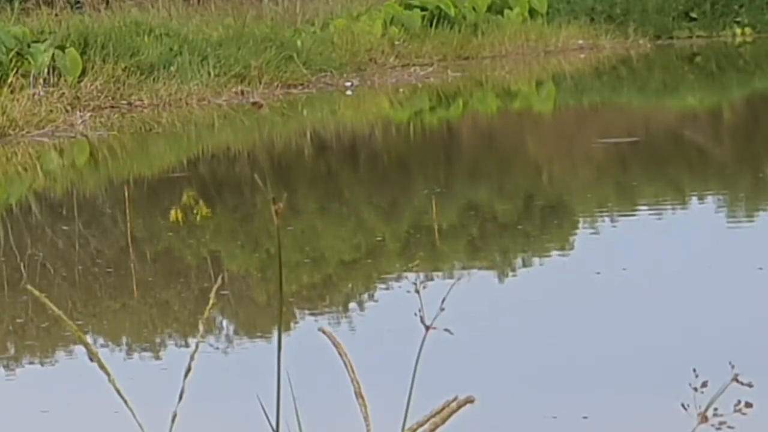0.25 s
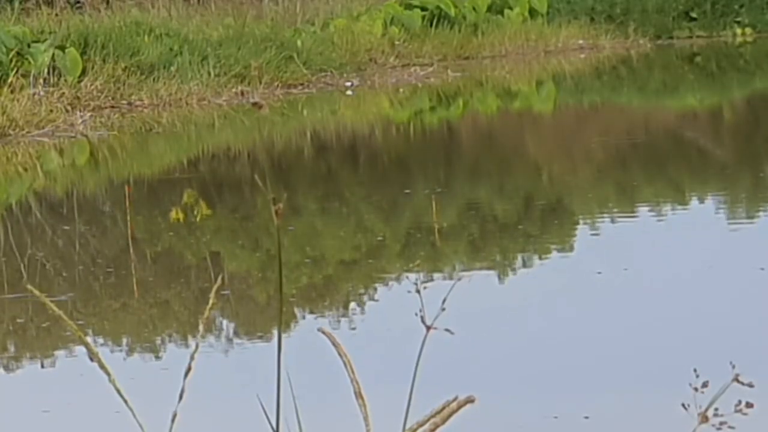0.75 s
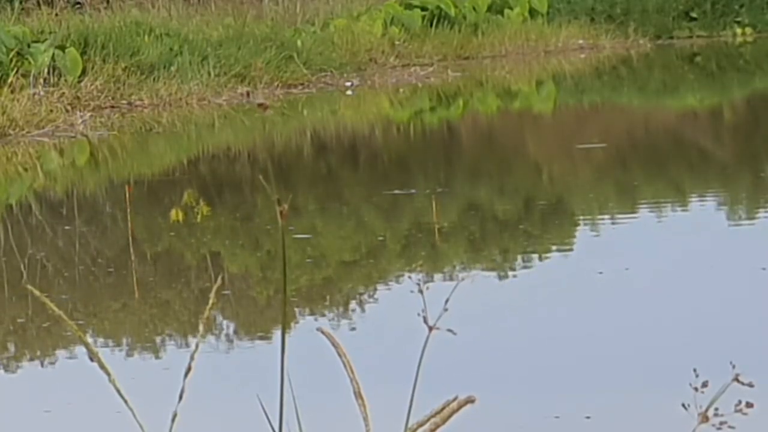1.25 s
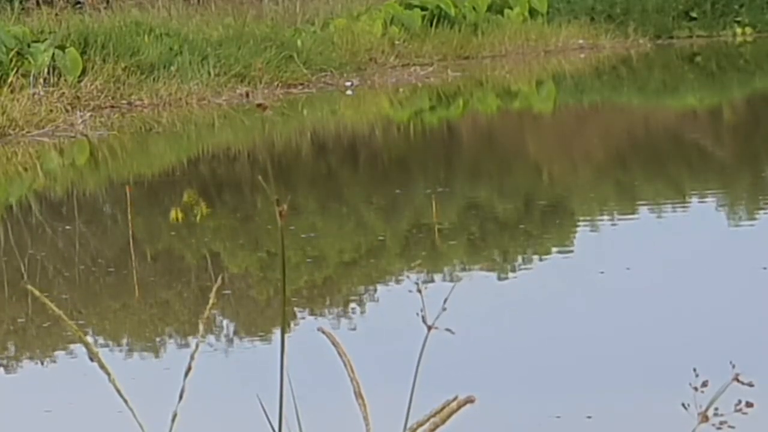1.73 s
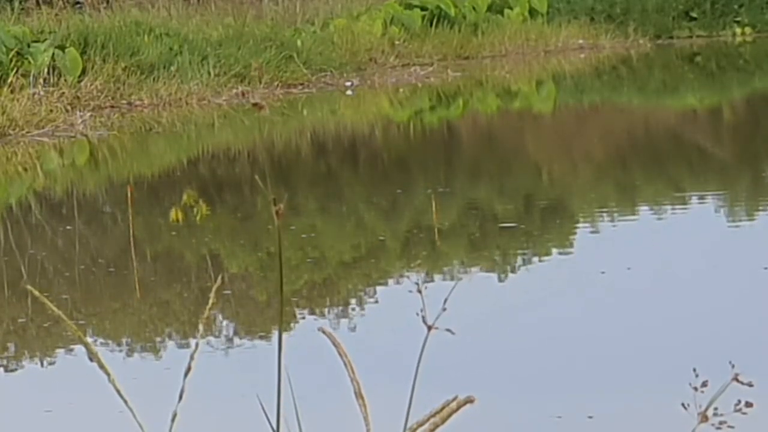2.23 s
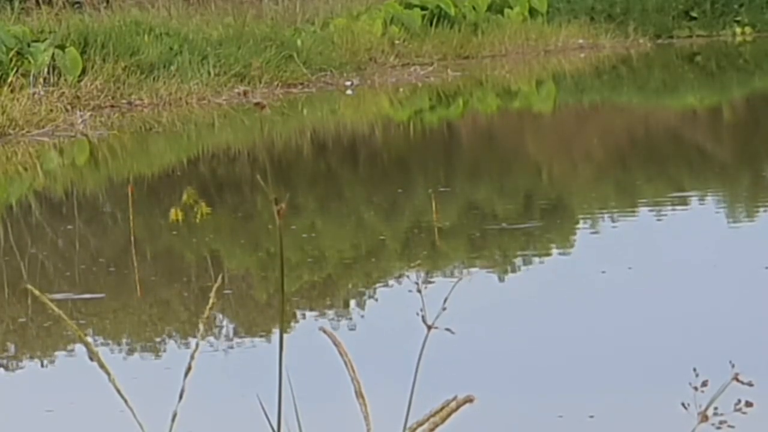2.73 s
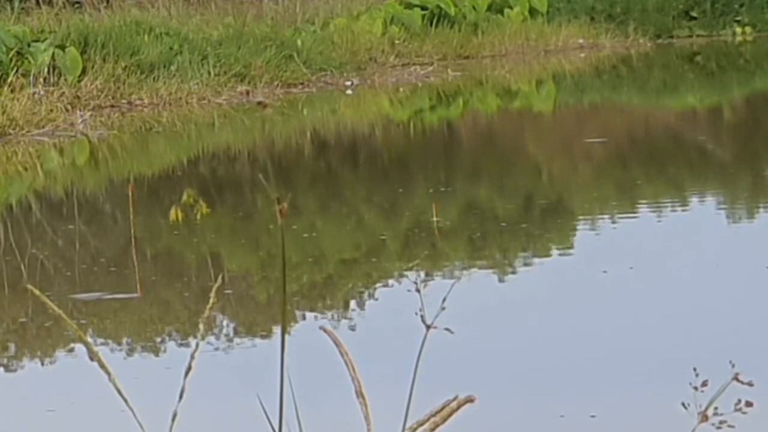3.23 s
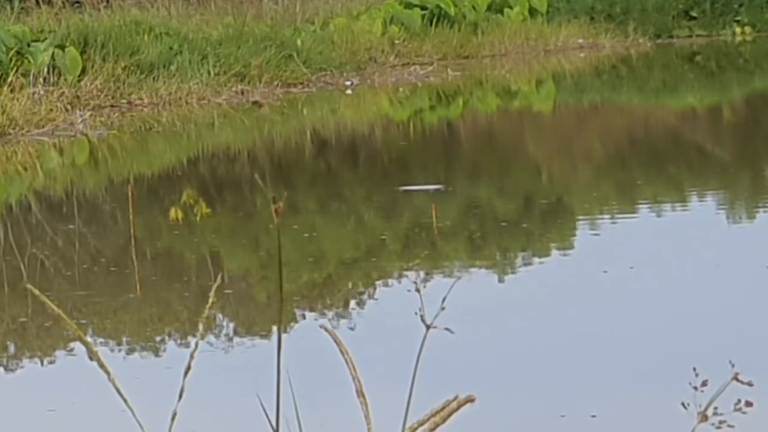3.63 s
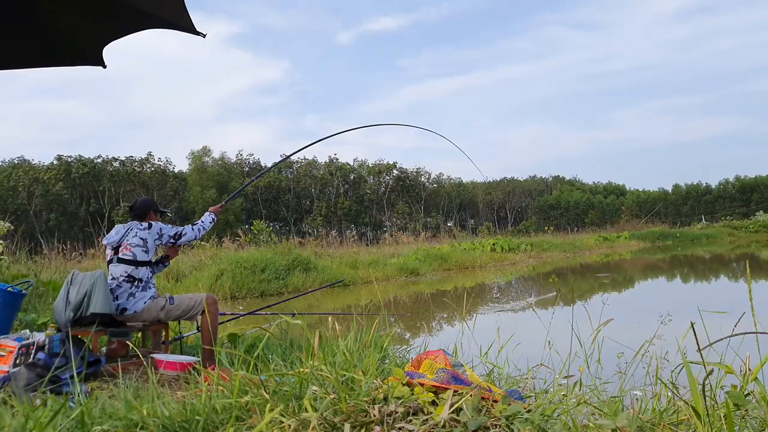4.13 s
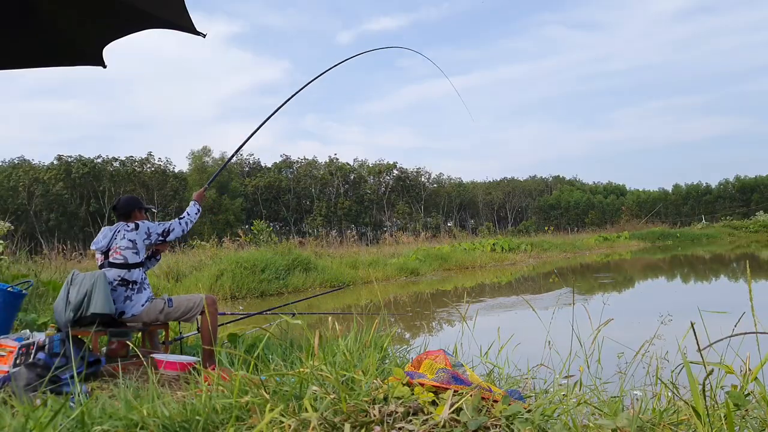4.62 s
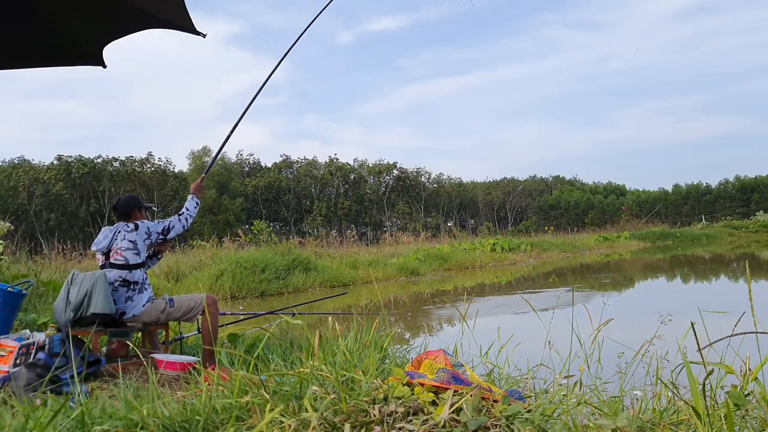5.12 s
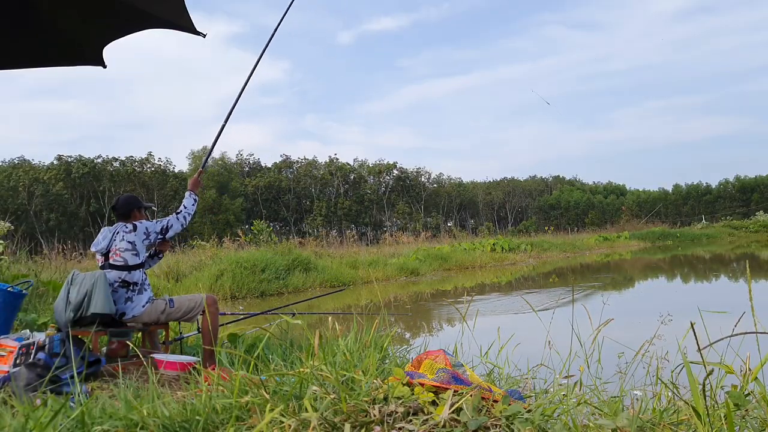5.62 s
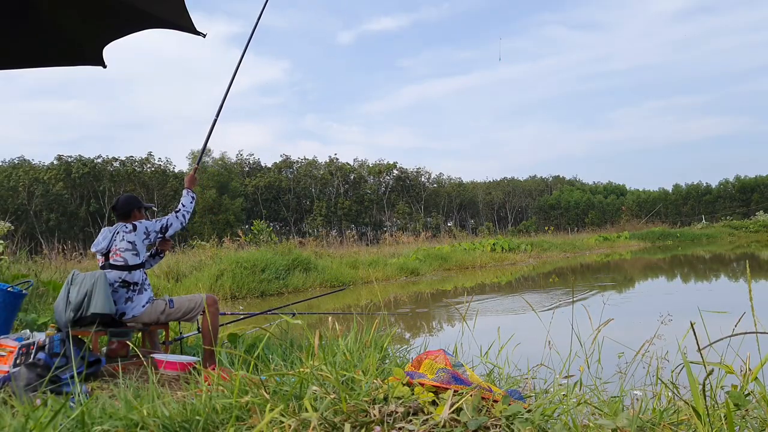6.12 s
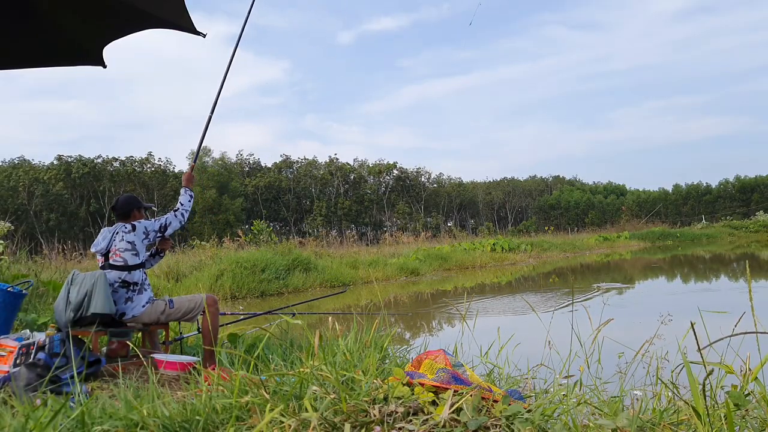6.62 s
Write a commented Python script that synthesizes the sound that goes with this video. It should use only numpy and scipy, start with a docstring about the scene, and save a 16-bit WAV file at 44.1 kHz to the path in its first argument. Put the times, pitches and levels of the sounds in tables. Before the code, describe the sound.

A quiet pond bank in wide stereo. Throughout, high crickets trill over a far, swelling insect buzz, a soft hiss and a low, distant rumble. A flock of birds chirps harshly, busiest in the first 2.5 seconds, then more sparsely. A cricket on the left grows louder from about 2 seconds and drops away near 3.7. A dove gives one barely audible coo around 3.4 seconds.

At about 4.1 seconds comes the loudest event: a quick whoosh falling in pitch, likely a fishing rod swept up, with one short, bubbly splash and spray. A dry tackle click and a couple of drops follow. From 4.5 seconds one songbird whistles three notes, while a higher one repeats a gliding phrase three times, louder each time. Insects tick in short runs. Near 6.5 to 6.8 seconds there are two small clicks and two drips as the crickets swell on both sides.

```python
"""Crickets trill and far insects swell over a low, distant rumble: a pond bank on a still day.
Three crickets rub their wings in quick strokes while a flock of birds chatters harshly.
A dove coos faintly. A whoosh falls in pitch, likely a rod swept up, and a hooked fish splashes once.
Drops and small tackle clicks follow, as insects tick and two songbirds whistle gliding notes."""
import sys
import numpy as np
from scipy import signal
from scipy.fft import rfft, irfft
from scipy.io import wavfile
from scipy.ndimage import uniform_filter1d

SR = 44100
rng = np.random.default_rng(int(sys.argv[2]) if len(sys.argv) > 2 else 0)


def transcribe(u):
    """Save the signal u as a 16-bit wav file named by the first command-line argument.

    u: samples, shape (n,) or (channels, n), limited to [-1, 1]; the rate is SR.
    q: integer samples, one column per channel.
    """
    v = np.clip(np.atleast_2d(u).T, -1, 1)
    q = np.round(v * 32767).astype(np.int16)
    wavfile.write(sys.argv[1], SR, q)


N = 302526
TIME = np.arange(N) / SR


RIGHT_BEAT, LEFT_BEAT, HIGH_BEAT = 88.0, 84.8, 112.48   # wing strokes per second
# Three crickets. Each row: time in seconds, wing strokes ahead of a steady beat, level in dB.
RIGHT_CRICKET = [(0, 0.22, -71.5), (1.5, 0.76, -70.5), (3.85, 1.35, -70), (3.95, 0.72, -69.5),
                 (5.4, 0.8, -66.5), (6.0, 0.59, -63.5), (6.86, 0.33, -61.5)]
LEFT_CRICKET = [(1.3, -0.38, -76), (1.52, -0.52, -70.5), (2.16, -0.26, -65.5), (2.23, -0.23, -61),
                (2.8, 0.0081, -59.5), (3.73, -0.31, -60), (3.76, -0.49, -76), (5.7, -0.69, -73),
                (6.3, -0.78, -63.5), (6.86, -0.23, -59)]
HIGH_CRICKET = [(0, -0.51, -78), (3.8, -0.57, -75), (4.2, -0.24, -75), (6.86, -0.82, -76)]

def cricket(rows, beat, top_hz, fall, stroke):
    """Each closing wing stroke is a pulse whose pitch falls; stroke is half its length in beats."""
    ahead, level_db = in_time(rows)
    from_peak = (beat * TIME + ahead + .5) % 1 - .5   # 0 at the height of a stroke
    swell = np.exp(-(from_peak / stroke) ** 2) * amp(0.96 * drift(60))
    hz = top_hz - fall * (from_peak + 0.23) * np.abs(from_peak + .2) + 40 * drift(49.14)
    return amp(level_db) * rms_one(tone(hz) * swell)


ARCH_HZ_PER_S = 1300   # a longer chirp arches higher in its middle
# The flock. Each row: start and length in seconds, level in dB, first pitch and slide in Hz.
CHIRPS = [(0.12, 0.12, -64.5, 2587, 96), (0.337, 0.1, -58.5, 2830, 284), (0.559, 0.13, -56, 2837, -100),
          (0.565, 0.091, -61, 4830, 201), (0.781, 0.1, -56, 2640, 446.5), (0.988, 0.13, -53, 2720, 59),
          (1.135, 0.029, -57, 5410, 20), (1.209, 0.099, -55, 2700, -37.5), (1.295, 0.062, -56, 3020, -150),
          (1.387, 0.037, -59.5, 2873, 32.5), (1.45, 0.067, -53, 2720, 1.5), (1.548, 0.042, -52.5, 2940, 63),
          (1.715, 0.13, -57, 2620, 80), (1.981, 0.098, -59.5, 2700, -1), (2.084, 0.1, -56.5, 3150, -150),
          (2.252, 0.13, -60, 2836, 198), (2.488, 0.12, -61, 2410, 299), (2.52, 0.073, -62.5, 4770, 294),
          (2.965, 0.052, -59.5, 3010, -330), (3.153, 0.073, -59.5, 2620, -200),
          (3.649, 0.05, -57.5, 2860, 307.5), (3.83, 0.11, -62.5, 2360, 269.5),
          (4.221, 0.062, -53.5, 2526, 404.5), (4.378, 0.078, -55.5, 2238, 244),
          (4.395, 0.11, -64, 4850, -800), (4.449, 0.036, -57, 3430, 44), (4.956, 0.052, -58.5, 2160, 143),
          (6.497, 0.067, -65, 2650, -250)]

def flock():
    """Harsh chirps from a shaky voice; midway through a low chirp a hoarse part opens above it."""
    level, hoarse, hz = np.zeros((2, N)), np.zeros(N), np.full((2, N), 3000.)
    for start, length, level_db, first_hz, slide_hz in CHIRPS:
        bird = int(first_hz > 4000)   # 0 is low, 1 is high, so their chirps can overlap
        progress = np.clip((TIME - start) / length, 0, 1)
        arch = np.sin(np.pi * progress) ** 2
        level[bird] += amp(level_db) * note(start, length, 0.0054)
        hoarse += amp(level_db - 2.5) * arch * (1 - bird)
        pitch = first_hz + slide_hz * progress + ARCH_HZ_PER_S * length * arch
        hz[bird] = np.where((progress > 0) & (progress < 1), pitch, hz[bird])
    clear = np.minimum(level[0] / amp(-51), 1)   # near birds ring clear, far ones only rasp
    wavering_hz = hz[0] + 60 * drift(35)
    voice = (.8 * rough(wavering_hz, 270) + clear * tone(wavering_hz)) * amp(2.5 * drift(40))
    return level[0] * voice + hoarse * rough(hz[0] + 620, 310) + level[1] * rough(hz[1], 360)


# Whoosh and spray. Each row: time in seconds, whoosh level in dB, its pitch in Hz, spray level in dB.
WHOOSH_AND_SPRAY = [(4.068, -57, 1700, -30), (4.1, -46.5, 1450, -46), (4.14, -51, 793, -51),
                    (4.168, -41, 649, -48.5), (4.2, -48.5, 694, -49), (4.26, -59, 675, -54),
                    (4.29, -63, 650, -75), (4.48, -79.5, 798, -70)]
# Single bubbles and drops. Each row: start in seconds, strength in dB, pitch in Hz.
DROPS = [(4.072, -29.5, 2980), (4.085, -26, 1560), (4.096, -28, 2690), (4.11, -31, 1000),
         (4.153, -25.5, 686), (4.163, -32.5, 490), (4.165, -26.5, 691), (4.176, -26.5, 2680),
         (4.179, -26.5, 652), (4.252, -39.5, 623), (4.36, -50, 935), (4.564, -46, 1167),
         (6.615, -48.5, 1410), (6.781, -36, 1050)]

def whoosh_and_splash():
    """A whoosh falls in pitch, likely the rod swept up, over a splash with single drops and spray."""
    whoosh_db, whoosh_hz, spray_db = in_time(WHOOSH_AND_SPRAY)
    start, end = WHOOSH_AND_SPRAY[0][0], WHOOSH_AND_SPRAY[-1][0]
    pops = rng.random(N) < 900 / SR   # about 900 a second
    pops = pops * amp(2.8 * np.minimum(rng.exponential(1, N), 4)) * rng.choice([-1, 1], N)
    sweep = rough(whoosh_hz, 193) * 700 / whoosh_hz
    crackle = rms_one(band(pops, 1130, 2850)) * whoosh_hz / 1100
    hiss = rms_one(band(rms_one(pops) + 2.0 * noise_pair(0), 3200, 10800))
    sounding = note(start, end - start, 0.0048)
    whoosh = sounding * amp(whoosh_db) * (sweep + crackle)
    spray = sounding * np.clip((TIME - start) / 0.11, 0, 1) * amp(spray_db) * hiss
    return whoosh + rings(DROPS, cycles=27.0, rise=0.16, attack_s=0.002), spray


# The fishing tackle. Each entry: start of a click in seconds.
CLICK_TIMES = [4.312, 6.494, 6.669]

def tackle_clicks():
    """Dry clicks: bursts of bright noise a few milliseconds long."""
    starts = np.zeros(N)
    starts[np.round(np.array(CLICK_TIMES) * SR).astype(int)] = amp(-44.5)
    fading = signal.lfilter([1], [1, -np.exp(-1 / (0.002 * SR))], starts + 1e-18)
    return band(fading * rng.standard_normal((2, N)), 2300, 14000, order=1)


# The low singer's notes. Each row: start and length in seconds, level in dB, top pitch in Hz.
LOW_NOTES = [(4.561, 0.039, -50.5, 3540), (4.647, 0.085, -50, 3750), (4.789, 0.085, -48.5, 3406)]
# Their shared shape. Each row: seconds into the note, Hz below its top.
LOW_SHAPE = [(0, 660), (0.018, 1.6), (0.033, 154), (0.053, 470), (.072, 212), (0.094, 510)]
# The high singer's tune. Each row: seconds into the verse, pitch in Hz.
VERSE_TUNE = [(0, 7740), (.08, 6950), (0.101, 6380), (0.123, 6180), (.16, 6514), (0.282, 6390),
              (0.333, 6190), (0.344, 7440), (.362, 6800), (0.481, 7200), (0.506, 6840), (.53, 7800),
              (0.6, 6960), (0.627, 5720), (.655, 5630), (.672, 5180)]
# Its notes. Each row: seconds into the verse, length in seconds, dB added to the verse's level.
VERSE_NOTES = [(0, .332, 1), (.336, .026, -2), (.48, .075, 4), (.6, .07, -1)]
# Its verses. Each row: start in seconds, level in dB.
VERSES = [(4.479, -67.5), (5.4, -62.5), (6.323, -55)]

def songbirds():
    """One bird whistles three notes, a higher one a verse three times; moving air flutters them."""
    low = sum(whistle(start, length, db, [(t, top_hz - hz) for t, hz in LOW_SHAPE], 0.0061)
              for start, length, db, top_hz in LOW_NOTES)
    high = sum(whistle(start + at, length, db + note_db, [(t - at, hz) for t, hz in VERSE_TUNE], 0.00099)
               for start, db in VERSES for at, length, note_db in VERSE_NOTES)
    return (low + high) * amp(2.0 * drift(62))


# Runs of ticks. Each row: start in seconds, how many, gap in seconds, pitch in Hz, strength in dB.
TICK_RUNS = [(3.813, 3, .021, 4380, -46), (3.911, 2, .041, 4330, -44), (4.536, 5, .0515, 4320, -45),
             (5.229, 2, .05, 3780, -42), (5.275, 3, .05, 4400, -47), (5.418, 3, .025, 4300, -44),
             (5.508, 3, .0715, 3750, -43), (5.752, 6, .0572, 3760, -44), (6.146, 3, .049, 4320, -46),
             (6.298, 2, .016, 3750, -45), (6.45, 2, .06, 3750, -48), (6.598, 2, .029, 3750, -46),
             (6.69, 3, .05, 3720, -45)]

def insect_ticks():
    """Short rough rings of uneven strength, a few in a row; the higher insect rasps longer."""
    ticks = [(start + k * gap, db + rng.normal(0, 1.6), hz)
             for start, count, gap, hz, db in TICK_RUNS for k in range(count)]
    low = rings([tick for tick in ticks if tick[2] < 4000], cycles=65, rise=0, attack_s=.0025)
    high = rings([tick for tick in ticks if tick[2] > 4000], cycles=190, rise=0, attack_s=.004)
    return low * (1 + .6 * drift(250)) + high * drift(200)


# The far insect chorus. Each row: time in seconds, level in dB, middle pitch in Hz.
CHORUS = [(0, -56, 3700), (.5, -71.5, 3610), (1.8, -62, 3755), (2.9, -78, 3774), (3.45, -65, 4005),
          (4.9, -69, 3750), (5.5, -69.5, 4320), (5.75, -62, 4470), (6.0, -70.5, 3750)]
# One far cricket. Each row: time in seconds, level in dB.
FAR_CRICKET = [(.4, -71.5), (.48, -91), (.9, -71), (2.35, -69.5), (2.5, -100)]

def far_insects():
    """Many insects blur into a swelling buzz, with one thin cricket above them."""
    chorus_db, chorus_hz = in_time(CHORUS)
    chorus = amp(chorus_db + 2 * drift(22)) * rough(chorus_hz, 330)
    cricket_db = in_time(FAR_CRICKET)[0] + 2.5 * drift(20)
    return chorus + amp(cricket_db) * rough(5590 + 40 * drift(3), 70)


# The far dove. Each row: start and length in seconds, level in dB.
COOS = [(3.38, .21, -79)]
# The coo's arch. Each row: how far through the note from 0 to 1, pitch in Hz.
COO_SHAPE = [(0, 930), (.4, 1075), (1.0, 910)]

def dove():
    """A faint coo that rises and falls, broken up by distance."""
    coo = sum(whistle(start, length, db, [(share * length, hz) for share, hz in COO_SHAPE], .02)
              for start, length, db in COOS)
    return coo * drift(40)


# The distant rumble. Each row: time in seconds, deep level in dB, upper level in dB.
RUMBLE = [(0, -45, -55), (1.1, -46, -46), (2.2, -49.5, -47), (2.9, -45, -51.5), (3.8, -49.5, -56),
          (4.7, -46.5, -53), (6.0, -46, -49), (6.86, -45.5, -58)]

def rumble():
    """Two lumpy bands of low noise, nearly alike in both ears."""
    deep_db, upper_db = in_time(RUMBLE)
    deep = rms_one(band(noise_pair(0.84), 55.8, 105.2))
    upper = rms_one(band(noise_pair(0.87), 101.7, 205.6, order=3))
    return deep * amp(deep_db) + upper * amp(upper_db + 2.1 * drift(30.0))


AIR_DB = -61.5
# The colour of the background hiss. Each row: frequency in Hz, relative strength in dB.
AIR_COLOUR = [(380, -8.5), (520, -40), (800, -22.5), (1900, -27.5), (2500, -19), (3200, -20), (5400, -21),
              (7130, -16.5), (8180, -14.5), (10400, -23), (11800, -32), (15500, -31)]

def air():
    """A soft, steady hiss that reaches the left ear a little late."""
    hz = np.maximum(np.fft.rfftfreq(N, 1 / SR), 1)
    colour_hz, colour_db = np.transpose(AIR_COLOUR)
    colour = amp(np.interp(np.log(hz), np.log(colour_hz), colour_db))
    left, right = amp(AIR_DB) * rms_one(irfft(rfft(noise_pair(0.19)) * colour, N))
    return np.array([np.roll(left, 20), right])


def whistle(start, length, level_db, tune, fade_s):
    """A pure note along a tune of (seconds into the note, Hz); the voice rounds its turns."""
    into_s, hz = np.transpose(tune)
    swell, out = note(start, length, fade_s), np.zeros(N)
    sung = swell > 0
    pitch = np.interp(TIME[sung], start + into_s, hz)
    out[sung] = tone(uniform_filter1d(pitch, size=200))
    return amp(level_db) * swell * out


def rings(events, cycles, rise, attack_s):
    """Pings that start softly and fade by 60 dB over some cycles; rise bends their pitch up."""
    out = np.zeros(N)
    for start, strike_db, hz in events:
        length, first = cycles / hz, round(start * SR)
        t = np.arange(round(length * SR)) / SR
        level = amp(strike_db - 60 * t / length) * (1 - np.exp(-t / attack_s))
        out[first:first + len(t)] += level * np.sin(2 * np.pi * hz * t * (1 + rise * t / length))
    return out


def note(start, length, fade_s):
    """One while a note lasts, fading at both ends."""
    return np.clip(np.minimum(TIME - start, start + length - TIME) / fade_s, 0, 1)


def tone(hz):
    """A pure tone that follows a pitch curve."""
    return np.sqrt(2) * np.sin(2 * np.pi * np.cumsum(hz) / SR)


def rough(hz, shake_hz):
    """A tone shaken into a narrow band of noise; faster shaking widens it."""
    shake = drift(shake_hz) + 1j * drift(shake_hz)
    return np.real(shake * np.exp(2j * np.pi * np.cumsum(hz) / SR))


def drift(rate_hz):
    """A smooth random wobble of typical size 1."""
    pole = np.exp(-2 * np.pi * rate_hz / SR)
    return rms_one(signal.lfilter([1], [1, -2 * pole, pole * pole], rng.standard_normal(N + SR))[SR:])


def noise_pair(alike):
    """White noise for two ears: unrelated at 0, the same at 1."""
    mid, side = rng.standard_normal((2, N))
    return np.sqrt((1 + alike) / 2) * mid + np.sqrt((1 - alike) / 2) * side * [[1], [-1]]


def band(x, low_hz, high_hz, order=2):
    """Keeps the sound between two frequencies."""
    return signal.sosfilt(signal.butter(order, [low_hz, high_hz], "band", fs=SR, output="sos"), x)


def in_time(rows):
    """Joins a table's rows with straight lines, giving values at every sample."""
    times, *columns = np.transpose(rows)
    return [np.interp(TIME, times, column) for column in columns]


def amp(db):
    """Turns dB into a multiplier."""
    return 10 ** (np.asarray(db) / 20)


def rms_one(x):
    """Scales a signal to an average strength (rms) of 1."""
    return x / np.sqrt(np.mean(np.abs(x) ** 2) + 1e-20)


def place(x, left_db, lag, echo_db, echo_s):
    """The left ear lags by some samples; grass and trees scatter a short echo to each ear."""
    at = np.arange(N)
    direct = np.array([np.interp(at - lag, at, x) * amp(left_db / 2), x * amp(-left_db / 2)])
    since = np.arange(round(.4 * SR)) / SR
    scatter = rng.standard_normal((2, len(since))) * amp(-60 * since / echo_s)
    scatter *= amp(echo_db) / np.sqrt(np.sum(scatter ** 2, axis=1, keepdims=True))
    return direct + signal.fftconvolve(x[None], scatter)[:, :N]


def scene():
    """Sets every source in its place around the pond, in stereo."""
    insects = far_insects()
    whoosh_and_drops, spray = whoosh_and_splash()
    right = cricket(RIGHT_CRICKET, RIGHT_BEAT, top_hz=7500, fall=2800, stroke=0.2)
    left = cricket(LEFT_CRICKET, LEFT_BEAT, top_hz=7373, fall=5500, stroke=0.16)
    high = cricket(HIGH_CRICKET, HIGH_BEAT, top_hz=10490, fall=8500, stroke=0.19)
    return (place(right, left_db=-14.5, lag=6.0, echo_db=-9.5, echo_s=0.11)
            + place(left, left_db=18.4, lag=-12.5, echo_db=0.5, echo_s=0.074)
            + place(high, left_db=-13, lag=6.4, echo_db=-19, echo_s=0.055)
            + place(flock(), left_db=.6, lag=20, echo_db=-5, echo_s=.15)
            + place(whoosh_and_drops, left_db=0.41, lag=-2.2, echo_db=-9, echo_s=0.11)
            + place(songbirds() + insect_ticks(), left_db=0, lag=13, echo_db=-10, echo_s=0.2)
            + place(insects + dove(), left_db=0.74, lag=18.55, echo_db=0, echo_s=0.029)
            + spray + tackle_clicks() + rumble() + air())


CUTOFF_HZ = 15900

def record(dry):
    """Cuts the highest treble steeply."""
    return signal.sosfilt(signal.cheby2(14, 70, CUTOFF_HZ, fs=SR, output="sos"), dry)


dry = scene()
out = record(dry)
transcribe(out)
```